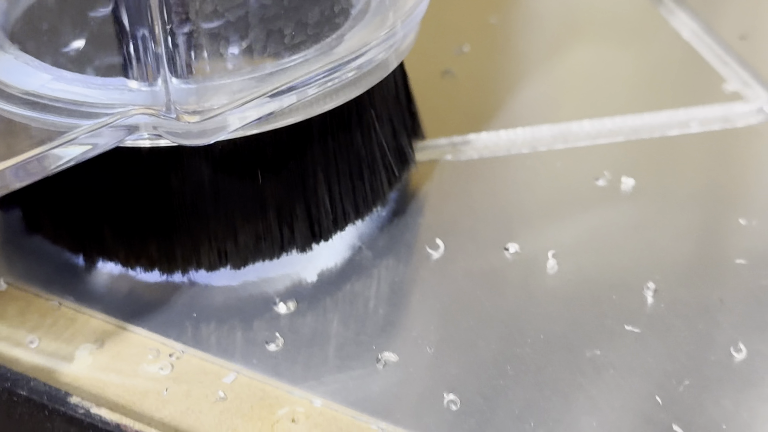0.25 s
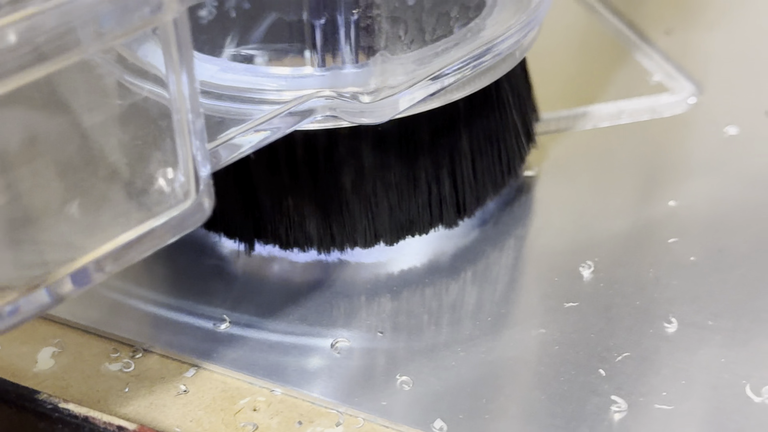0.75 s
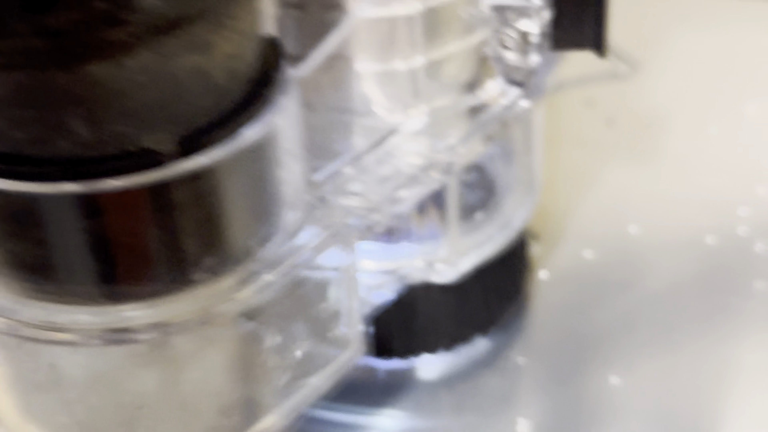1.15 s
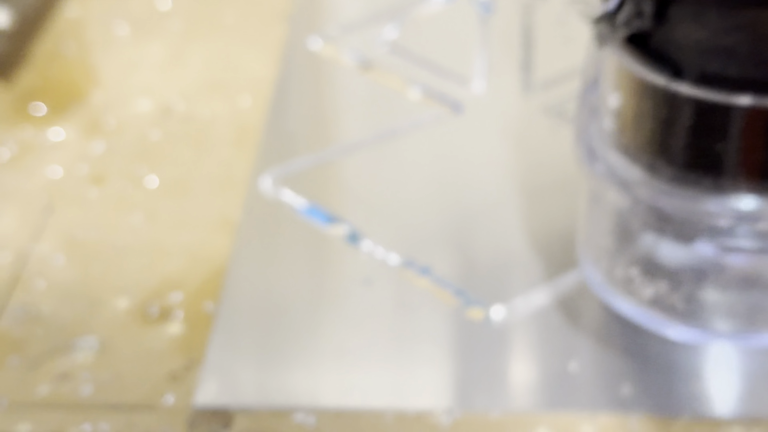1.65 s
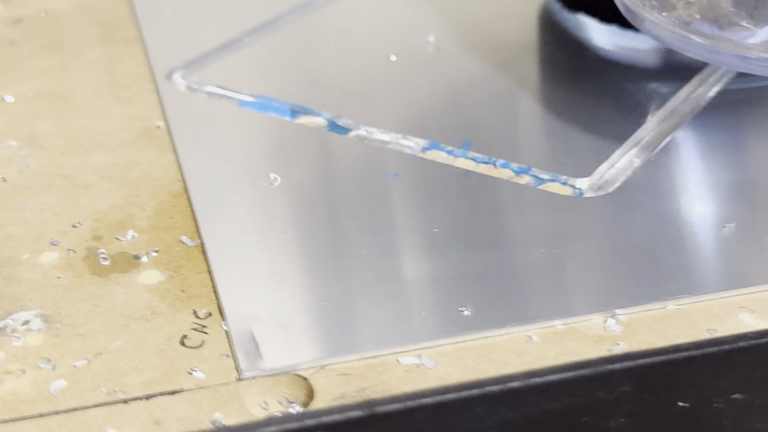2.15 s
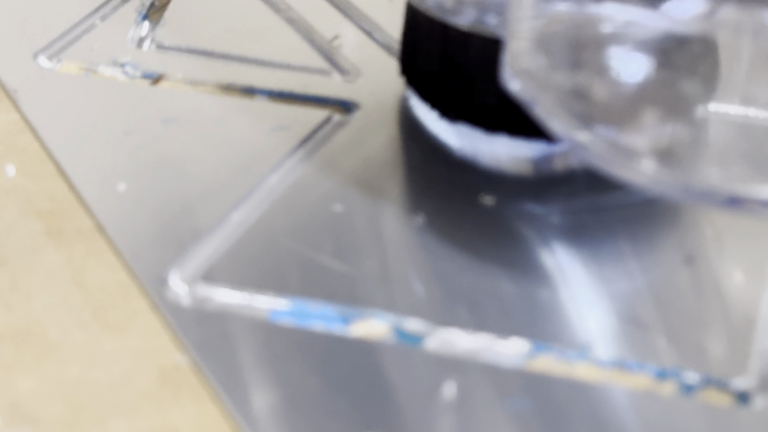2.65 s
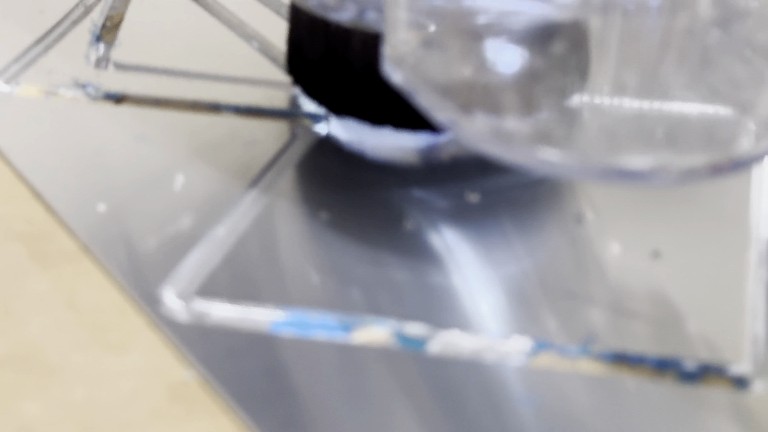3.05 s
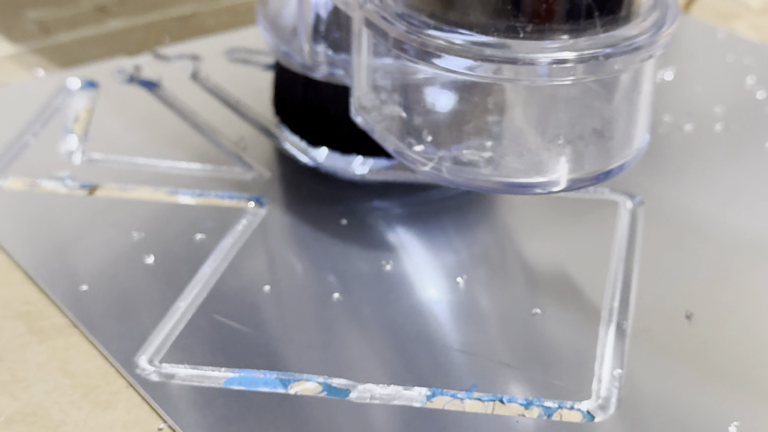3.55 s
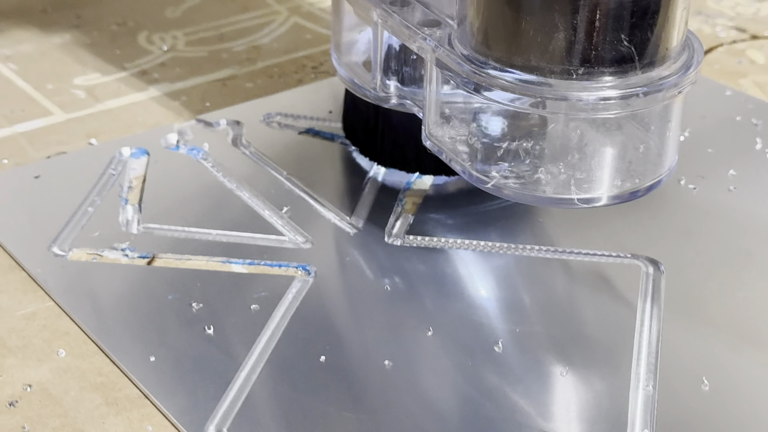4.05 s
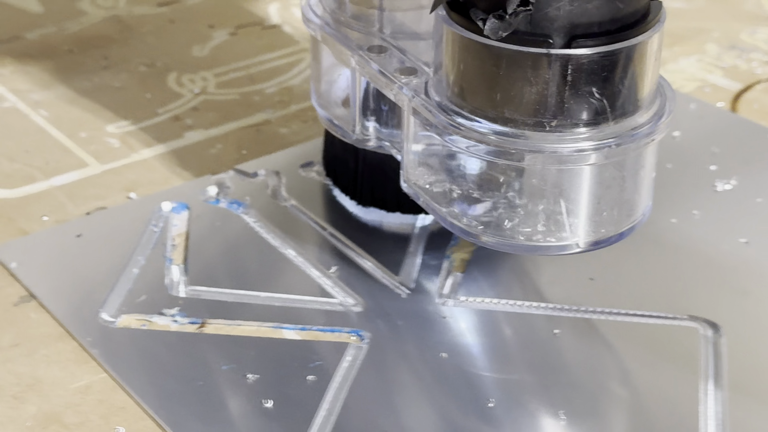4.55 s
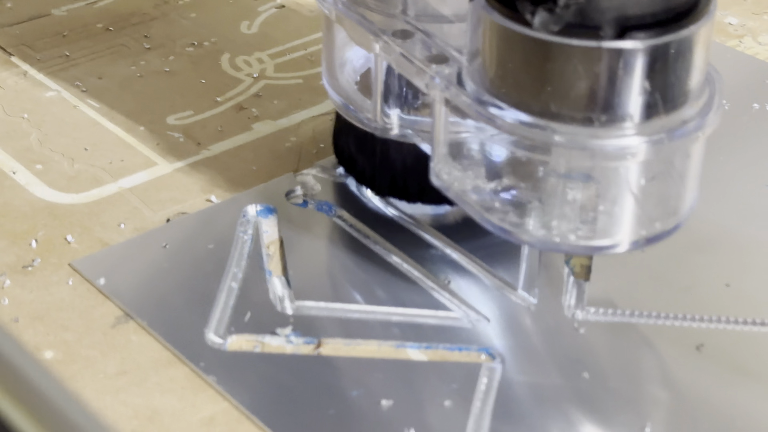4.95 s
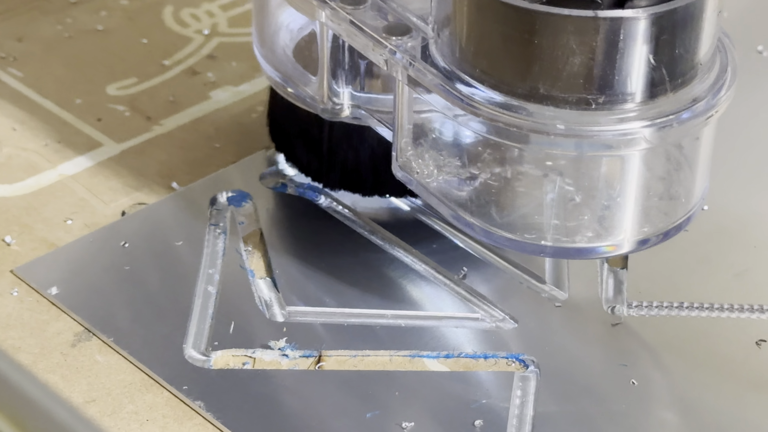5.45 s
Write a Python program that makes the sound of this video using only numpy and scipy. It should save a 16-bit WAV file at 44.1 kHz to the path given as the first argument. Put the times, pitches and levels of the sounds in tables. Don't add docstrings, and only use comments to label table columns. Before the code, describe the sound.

Continuous metal cutting in a workshop, caught close by a hand-held phone. A steady motor-like whine with dense metallic overtones dominates, loudest in the first second. It drops back, shudders with fast pulsing on two diagonal cuts, and gives short high squeals and chip rattles at corners. Hissing scrape, a low extractor roar and faint feed-motor hum sit underneath, with little room reflection.

```python
import sys
import numpy as np
from scipy import signal
from scipy.fft import rfft, irfft
from scipy.io import wavfile
from scipy.ndimage import uniform_filter1d

SR = 44100
rng = np.random.default_rng(int(sys.argv[2]) if len(sys.argv) > 2 else 0)


def amplitude_ratio(level_db):
    exponent = np.asarray(level_db, float) / 20
    return 10 ** exponent


def transcribe(u):
    v = np.clip(np.atleast_2d(u).T, -1, 1)
    q = np.round(v * 32767).astype(np.int16)
    wavfile.write(sys.argv[1], SR, q)


N = 251811
T = np.arange(N) / SR
HZ = np.fft.rfftfreq(N, 1 / SR)

# start [s], unbalance hum [dB over bite], motor whine [dB],
# bright ring [dB over bite].
LEGS = [(0, -9, -34.5, -1), (.28, -9.5, -27.5, -3.5), (.44, -8, -34, -3), (.7, -9, -35.5, -1.5),
        (.95, -11.5, -33.5, -3), (1.24, -10.5, -37.5, -4), (1.62, -10, -35, -2), (1.82, -12.5, -35, -5.5),
        (2.15, -13, -33.5, -9.5), (2.45, -13, -32, -9.5), (3.02, -13, -29, -4), (3.23, -18.5, -31, -9.5),
        (3.58, -19.5, -32, -7), (3.9, -11.5, -37.5, -7), (4.1, -9.5, -33, -3.5), (4.33, -9.5, -36, -3.5),
        (4.75, -7, -32.5, -15), (5.2, -18.5, -38, -13.5), (5.379, -15.5, -33.5, -2.5)]


def level(x, db):
    return x * amplitude_ratio(db) / np.sqrt(np.mean(x ** 2))


def curves(table):
    s, *columns = np.transpose(table)
    return [np.interp(T, s, c) for c in columns]


def colour(x, points):
    hz, db = np.transpose(points)
    gain_db = np.interp(np.log(HZ + 1), np.log(hz), db)
    return irfft(rfft(x) * amplitude_ratio(gain_db), N)


def band(x, lo_hz, hi_hz):
    return signal.sosfilt(signal.butter(2, [lo_hz, hi_hz], "band", fs=SR, output="sos"), x)


def walk(rate_hz):
    hold = int(SR / rate_hz)
    draws = rng.standard_normal(N // 20 + 1)[:N // hold + 1]
    slewed = uniform_filter1d(uniform_filter1d(np.repeat(draws, hold), hold), hold)
    return 1.9 * slewed[:N]


def leg_now():
    return np.searchsorted(np.array(LEGS)[1:, 0], T)


def by_leg(values):
    return uniform_filter1d(np.array(values, float)[leg_now()], size=2200, axis=0).T


def spindle():
    # time [s], motor whine at twice the turn [Hz].
    speed = [(0, 702.3), (.43, 701), (.49, 684.3), (.62, 679.5), (.94, 688.7), (1.32, 697), (2.04, 701),
             (2.8, 694.2), (2.93, 702), (3.12, 708.3), (3.85, 706.2), (3.95, 693), (4.12, 695), (4.47, 682),
             (4.8, 699.4), (5.1, 699.7), (5.3, 718.3), (5.71, 707.6)]
    # time [s], bite of the flute [dB].
    load = [(0, -25), (.46, -24), (.94, -23), (1.14, -24.5), (1.3, -30.5), (1.83, -33.5), (2.04, -31.5),
            (2.8, -27.5), (3.1, -29), (3.3, -26.5), (3.53, -25.5), (3.87, -29), (3.95, -35), (4.4, -27.5),
            (4.8, -30), (5.06, -32.5), (5.24, -36), (5.71, -36)]
    # time [s], half length [s], bite change [dB], whine change [Hz].
    pauses = [(0.362, 0.078, -8, 4), (1.878, 0.038, -2, 8), (3.023, .035, -3.5, 6.5),
              (3.075, 0.0281, 0.5, 13), (3.208, 0.027, -3, -2.5), (4.221, 0.066, -2.5, -0.5),
              (4.28, .09, -1, 16), (5.107, 0.042, 1, 0), (2.8, 0.13, 0.5, 0.5), (5.331, 0.071, 1.5, 1.5),
              (5.42, 0.03005, -0.5, -4), (3.106, .03, -1, 0), (5.6, 0.043, -1, -5)]
    (whine_hz,), (bite_db,) = curves(speed), curves(load)
    pause_db = 0
    for s, half, db, hz in pauses:
        whine_hz = whine_hz + hz * np.exp(-((T - s) / half) ** 2)
        pause_db = pause_db + db * np.exp(-((T - s) / half) ** 4)
    return whine_hz, bite_db + pause_db, pause_db


def judder():
    # time [s], throbs gone by [count], depth [dB].
    shaking_legs = [
        [(1.9, .56, .6), (2.1, 6.85, 1.1), (2.4, 15.43, 1.4), (2.6, 21.23, 2.1), (2.7, 23.97, 2.8),
         (2.9, 29.54, 2.8), (3.0, 32.49, .8)],
        [(4.6, 2.95, .05), (4.75, 7.4, .3), (5.0, 14.63, 2.1), (5.1, 17.45, 2.5), (5.2, 20.19, .8)],
    ]
    place, depth = np.zeros(N), np.zeros(N)
    for leg in shaking_legs:
        throbs, depth_db = curves(leg)
        on = (T > leg[0][0]) & (T < leg[-1][0])
        place[on] = throbs[on] % 1
        depth[on] = np.maximum(depth_db[on], 0)
    return place, np.abs(uniform_filter1d(depth, 1000))


def answers():
    strong = [(7, 4, 14, 13, 6), (6, 4, 17, 5, 9), (5, 7, 13, 4, 6), (5, 9, 7, 4, 6), (11, 3, 14, 10, 6),
              (3, 12, 9, 5, 8), (3, 9, 15, 4, 14), (9, 10, 4, 6, 14), (9, 4, 10, 14, 8), (9, 10, 7, 8, 14),
              (9, 10, 7, 3, 13), (6, 8, 15, 3, 10), (8, 4, 7, 10, 11), (8, 6, 19, 4, 5), (6, 5, 4, 8, 10),
              (14, 13, 6, 9, 4), (13, 5, 3, 7, 9), (4, 5, 7, 11, 3), (6, 5, 16, 11, 4)]
    strong_db = [5.5, 4, 4, -9, -7]
    faint = [(9, 18, 16, 8, 21), (11, 20, 14, 3, 13), (11, 20, 16, 8, 21), (13, 16, 14, 10, 12),
             (7, 20, 18, 9, 12), (10, 17, 20, 7, 21), (11, 19, 12, 5, 20), (7, 16, 18, 5, 15),
             (11, 12, 14, 5, 15), (4, 17, 21, 3, 12), (4, 20, 13, 11, 19), (5, 17, 21, 11, 14),
             (5, 13, 15, 3, 14), (11, 13, 14, 3, 15), (7, 13, 21, 3, 17), (5, 21, 10, 7, 20),
             (6, 16, 21, 8, 19), (10, 17, 21, 9, 20), (10, 17, 13, 3, 18)]
    faint_db = [2, 2.5, 4, -2.5, -6]
    pickiness = [0.94, 1.2, 1.03, 1, 1, 0.89, 1.02, 0.78, 1, 0.44, 0.87, 1.08, 1.2, 1.34, 1.15, .9, .8, 1.8,
                 0.63]
    out = np.zeros((len(LEGS), 45))
    for multiples, db in [(faint, faint_db), (strong, strong_db)]:
        np.put_along_axis(out, np.array(multiples, int), np.array([db]), axis=1)
    return out * np.array(pickiness)[:, None]


def throb_shape(fall, skew):
    sides = np.arange(-7, 8)
    first, higher = np.abs(sides) == 1, np.abs(sides) > 1
    size = amplitude_ratio(np.where(higher, 3.4, 1.5) * rng.standard_normal(len(sides)))
    timing = np.exp(np.where(higher, 1.3j, .6j) * rng.standard_normal(len(sides)))
    quick_rise = np.exp(.55j * (sides - np.sign(sides)))
    weights = size * timing * quick_rise * amplitude_ratio(skew * np.sign(sides) - fall * (np.abs(sides) + 1))
    cycle = np.exp(2j * np.pi * np.outer(sides, np.arange(256) / 256))
    return (weights * first) @ cycle, (weights * higher) @ cycle


def cutter(turn, bite_db, pause_db, place, depth_db):
    # multiple of the turn, level as the whole sheet answers [dB].
    whole_sheet = [(3, -9.5), (4, -7.5), (5, -12.5), (6, -13.5), (7, -7.5), (8, -10.5), (9, -12),
                   (10, -13.5), (11, -13), (12, -16.5), (13, -17), (14, -15)]
    # frequency [Hz], level [dB].
    bright_ring = [(5000, -2), (7000, 0.5), (9000, 1), (10500, -13), (12500, -21), (15800, -11)]
    # time [s], half length [s], centre [Hz], half width [Hz], lift of the ring [dB].
    squeals = [(0.932, 0.093, 8750, 500, 4.5), (1.164, 0.081, 6900, 251.5, 4.5),
               (0.745, 0.25, 6900, 200, 2), (3.024, 0.04, 9900, 797, 21), (3.745, 0.026, 10800, 700, 27.5),
               (3.78, .025, 14100, 895, 35), (3.785, 0.021, 10900, 700, 23), (5.54, 0.028, 10370, 997, 22),
               (5.584, 0.031, 10940, 1124, 33), (5.687, 0.052, 5600, 299, 6),
               (2.806, 0.32, 7940, 604, 16.5)]
    _, hum_db, whine_db, ring_db = by_leg(LEGS)
    legs = answers()
    legs[:, 3:15] += np.transpose(whole_sheet)[1]
    legs[:, 3:15] -= 10 * np.log10(np.sum(amplitude_ratio(legs[:, 3:15]) ** 2, axis=1, keepdims=True))
    s, half, hz, width, lift_db = np.array(squeals).T[:, :, None]
    squealing = lift_db * np.clip(2 - 2 * np.abs(T - s) / half / 1.03, 0, 1)
    flutter_db = 1 + 2.2 * np.exp(-((T - 3.1) / .08) ** 2)
    step = (place * 255).astype(int)
    out = 0
    for k in range(1, 45):
        if k == 1:
            db = bite_db + hum_db + 0.71 * walk(15)
            give = .04 * depth_db ** 2
        elif k == 2:
            db = whine_db + 0.66 * pause_db + 0.71 * walk(15)
            give = .07 * depth_db ** 2
        elif k < 15:
            db = bite_db - .6 + by_leg(legs[:, k]) + 1.16 * walk(4.954) + flutter_db * walk(30.02)
            give = 0.25 * np.sqrt(depth_db)
        else:
            ring_shape_db = np.interp(350 * k, *np.transpose(bright_ring))
            db = bite_db + ring_db + by_leg(legs[:, k]) - 15.0 + ring_shape_db
            db = db + 1.7 * walk(9) + 1.9 * walk(40)
            db = db + np.exp(-((350 * k - hz[:, 0]) / width[:, 0]) ** 2) @ squealing
            give = 0.21 * np.sqrt(depth_db)
        give = give * (1.5 if k % 2 else .75)
        first, higher = throb_shape(fall=2.8, skew=4.6)
        throb = 1 + give * first[step] + 2.03 * give ** 2 * higher[step]
        throb = throb / np.sqrt(1 + 1.3 * give ** 2)
        phase = k * turn + 2 * np.pi * rng.random() + 0.2 * walk(30)
        out = out + amplitude_ratio(db) * np.imag(throb * np.exp(1j * phase))
    return np.sqrt(2) * out


def sheet(x):
    leg, out = leg_now(), 0
    for k in range(len(LEGS)):
        ring = rng.standard_normal(1024) * np.exp(-np.arange(1024) / 260.)
        share = np.sqrt(np.abs(uniform_filter1d(1. * (leg == k), 3000)))
        out = out + signal.oaconvolve(x * share, ring / np.sqrt(np.sum(ring ** 2)))[:N]
    return out


def chips(turn, bite_db, shake_db):
    # scrape [dB over bite], brightness [dB].
    scrape_legs = [(-8, -5.5), (-5, -5), (-11, 4), (-13.5, 6.5), (-13.5, 5.5), (-17, 11), (-9, 6.5),
                   (-6, -3), (-4, -2.5), (-4, -2.5), (-8.5, 1.5), (-9.5, -1.5), (-13.5, 4), (-4, -4),
                   (-7, -5), (-7, 3), (-6, 3), (-2, -16), (-5, 1.5)]
    # low edge [Hz], high edge [Hz], level [dB], share of the brightness [factor].
    scrape_bands = [
        (850, 4300, -4.5, 0.35),
        (3830, 10600, 0, 0.18),
        (8150, 14000, -2.5, 1),
    ]
    # time [s], length [s], level [dB].
    jams = [(0.444, 0.0042, -25), (1.813, 0.024, -34), (3.06, .012, -38), (3.107, 0.0049, -28),
            (3.128, 0.0064, -25.5), (3.381, 0.036, -29), (3.687, 0.0038, -27), (3.868, 0.018, -30),
            (5.602, .012, -35)]
    puff = 1 + 0.88 * np.cos(turn)
    sizes = amplitude_ratio(1.47 * rng.exponential(size=N))
    out = 0
    scrape_db, bright_db = by_leg(scrape_legs)
    for lo, hi, own_db, share in scrape_bands:
        db = bite_db + scrape_db + own_db + share * bright_db
        scrape = level(band(rng.standard_normal(N) * sizes, lo, hi) * puff, 0)
        out = out + scrape * amplitude_ratio(db - 1.48 + 1.4 * shake_db + 0.28 * walk(42))
    out = 0.82 * out + 1.116 * sheet(out)
    rattle = level(band(rng.standard_normal(N), 440, 8700), 0)
    for s, length, db in jams:
        out = out + rattle * amplitude_ratio(db) * np.exp(-((T - s) / length) ** 2)
    drum = level(band(rng.standard_normal(N), 570, 1850), -17.5)
    drum = drum * amplitude_ratio(bite_db + scrape_db + 1.2 * shake_db)
    return out + drum


def hand_bump():
    return level(band(rng.standard_normal(N), 30.2, 72.7), -64) * np.exp(-((T - 5.1) / .15) ** 2)


def extractor():
    # frequency [Hz], air roar [dB per Hz].
    air = [(25, -54), (60, -5.5), (120, -2.5), (170, -0.5), (210, 0), (300, 5.5), (500, 6.5), (700, 6),
           (900, -1), (2500, -3.5), (6000, -20), (10000, -6.5), (15800, -14)]
    # centre [Hz], width [Hz], level [dB].
    fan = [
        (120.4, 6, -64),
        (168.3, 16.4, -56.5),
    ]
    out = level(colour(rng.standard_normal(N), air), -43.0) * amplitude_ratio(0.96 * walk(3.17))
    for hz, width, db in fan:
        out = out + level(band(rng.standard_normal(N), hz - width / 2, hz + width / 2), db)
    return out


def feed_motor():
    # start [s], end [s], start pitch [Hz], end pitch [Hz], level [dB].
    driven = [
        (0.47, 1.799, 244, 245, -61),
        (3.097, 4.25, 232.8, 237.4, -60.5),
    ]
    out = 0
    for start, end, hz_0, hz_1, db in driven:
        on = np.clip(np.minimum(T - start, end - T) / 0.025, 0, 1)
        phase = 2 * np.pi * np.cumsum(np.interp(T, [start, end], [hz_0, hz_1])) / SR
        out = out + on * amplitude_ratio(db + 10.0 + 0.5 * walk(10.0)) * np.sin(phase)
    return out


def room(mid):
    # frequency [Hz], reflected level [dB].
    reflected = [(60, -26), (380, -14.0), (1300, -17), (2400, -16.5), (4400, -15.5),
                 (5500, -32), (7000, -14.0), (8000, -33), (12000, -19)]
    walls = rng.standard_normal(12000) * np.exp(-np.arange(12000) / 4700.0)
    side = signal.fftconvolve(mid, walls / np.sqrt(np.sum(walls ** 2)))[:N]
    side = colour(side, reflected)
    return side + amplitude_ratio(-15.5) * band(mid, 600, 1700) + amplitude_ratio(-16) * band(mid, 230, 470)


def scene():
    # frequency [Hz], cancelling by the hood [dB].
    hollow = [(740, -0.5), (845, -5), (970, 0)]
    whine_hz, bite_db, pause_db = spindle()
    wobble = 1 + 0.00018 * walk(40) + 0.001114 * walk(300)
    turn = np.pi * np.cumsum(whine_hz * wobble) / SR
    place, depth_db = judder()
    shake_db = depth_db * np.cos(2 * np.pi * place)
    tone = cutter(turn, bite_db, pause_db, place, depth_db)
    scrape = chips(turn, bite_db + depth_db, shake_db)
    mid = colour(tone + scrape + hand_bump() + extractor() + feed_motor(), hollow)
    side = room(mid)
    return np.array([mid + side, mid - side])


def top_cut(x):
    return signal.sosfilt(signal.butter(12, 16110, fs=SR, output="sos"), x)


def record(dry):
    treble_hz, port_lag, top_hz = 7900, 14, 15720
    lead = np.exp(2j * np.pi * np.maximum(HZ - treble_hz, 0) * port_lag / SR)
    rounded = 0.72 * np.tanh(dry / 0.67)
    ports = np.array([lead ** 0, lead])
    mix = irfft(rfft(rounded) * ports * (HZ < top_hz), N)
    return top_cut(mix)


dry = scene()
out = record(dry)
transcribe(out)
```